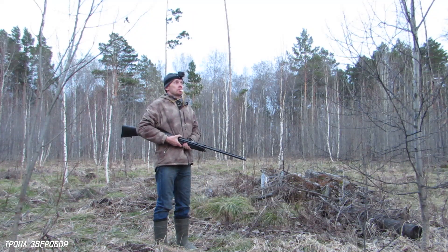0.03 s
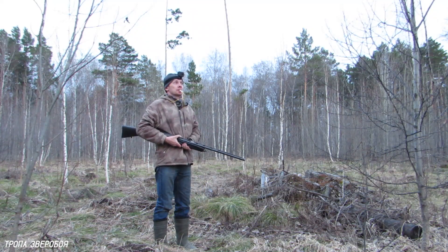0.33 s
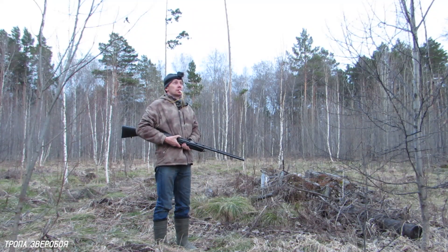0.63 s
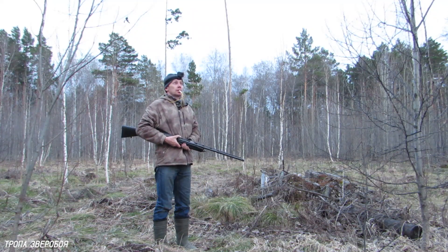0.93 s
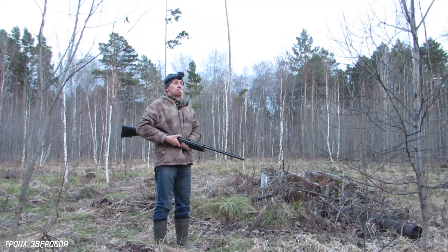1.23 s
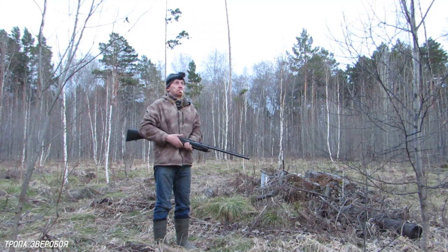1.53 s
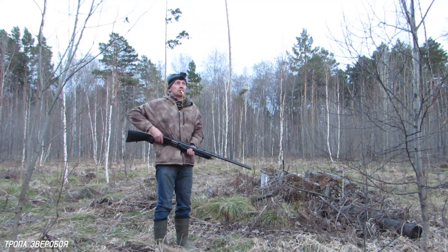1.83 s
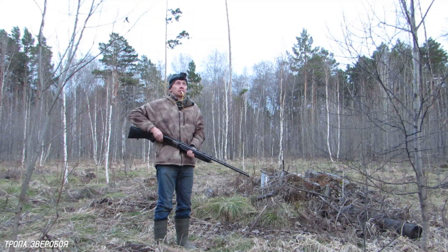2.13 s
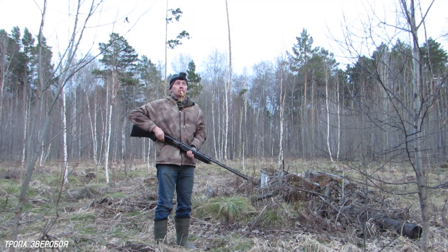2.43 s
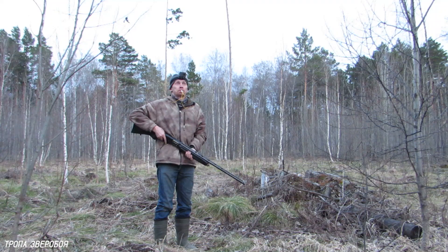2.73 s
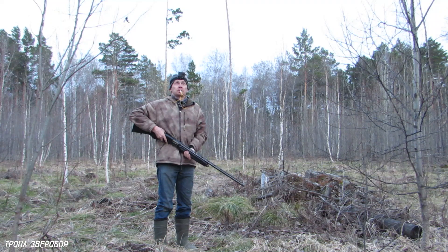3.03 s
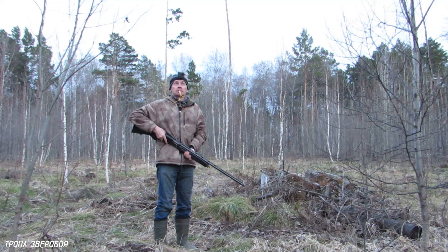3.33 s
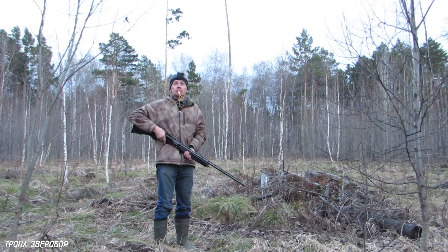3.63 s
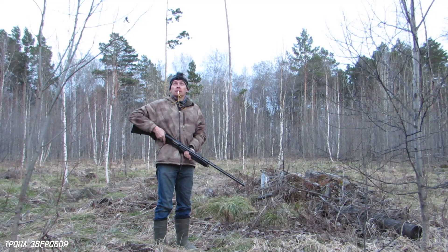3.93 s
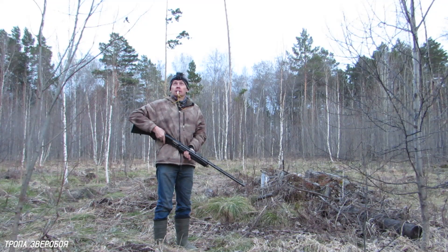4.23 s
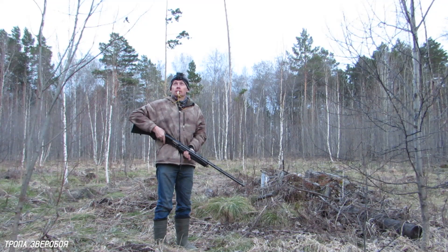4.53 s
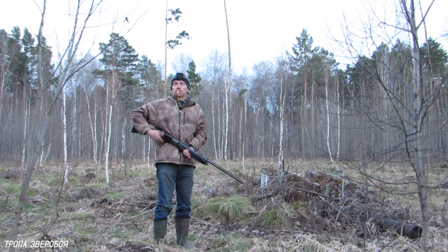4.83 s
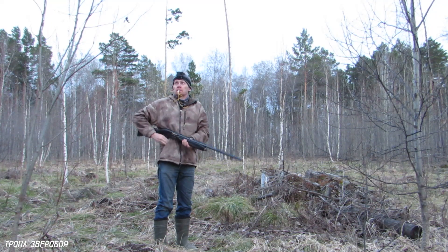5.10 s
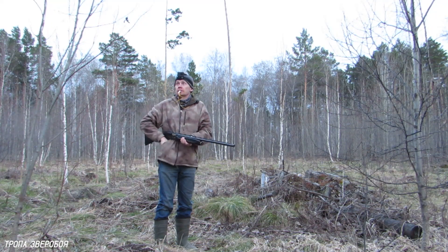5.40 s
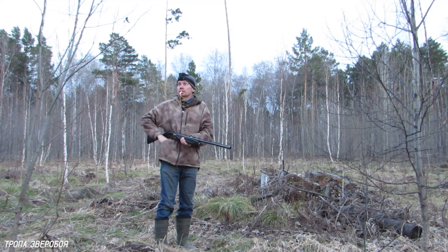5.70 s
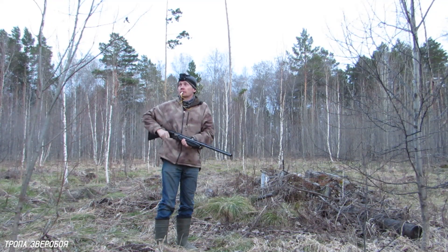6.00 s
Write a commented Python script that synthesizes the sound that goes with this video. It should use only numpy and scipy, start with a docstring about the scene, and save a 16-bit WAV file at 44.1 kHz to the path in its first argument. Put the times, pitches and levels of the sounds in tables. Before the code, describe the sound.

A small whistle imitates a bird with high, hissy squeaks, two at a time, three times over, near and to the left. Each squeak sweeps quickly upward and leaves a brief tail among the trees. A jacket rustles faintly around the first and last pairs, and gear clicks just before the second. Underneath lie the quiet murmur of woodland and a low, uneven wind rumble on the microphone.

```python
"""Woodcock lure in a clearing

A hunter in still woodland imitates a woodcock's flight call on a small whistle, close to the left
microphone: three pairs of squeaks. Each puff drives the whistle up through its registers in about a
tenth of a second, over a hiss of air, and the trees return a short tail. His jacket rustles and his
gear ticks as he shifts; light wind rumbles on the microphone and far trees murmur."""
import sys
import numpy as np
from scipy import signal
from scipy.fft import rfft, irfft, next_fast_len
from scipy.io import wavfile

SR = 44100
rng = np.random.default_rng(int(sys.argv[2]) if len(sys.argv) > 2 else 0)


def store_pcm(level_fs):
    """Save levels as 16-bit WAV."""
    pcm = np.round(np.clip(level_fs, -1, 1) * 32767).astype(np.int16)
    wavfile.write(sys.argv[1], SR, np.atleast_2d(pcm).T)


N = 267246
PREROLL = SR // 5
TIME = np.arange(-PREROLL, N) / SR


def amp(db):
    """Decibels to gain."""
    return 10 ** (np.asarray(db) / 20)


def unit_rms(x):
    """Scale to rms 1."""
    return x / np.sqrt(np.mean(x ** 2) + 1e-20)


def low_pass(x, hz, order=2):
    """Butterworth low-pass."""
    return signal.sosfilt(signal.butter(order, hz, fs=SR, output="sos"), x)


def wobble(hz, size):
    """Random wavering up to the given rate, rms 1."""
    return unit_rms(low_pass(rng.standard_normal(size + PREROLL), hz)[PREROLL:])


def noise(spectrum, size, channels=1):
    """Independent noises shaped by an EQ curve and rolled off below its first point, rms 1."""
    hz, db = np.transpose(spectrum)
    n = next_fast_len(size)
    bin_hz = np.maximum(np.fft.rfftfreq(n, 1 / SR), 1)
    gain = amp(np.interp(np.log(bin_hz), np.log(hz), db)) * np.minimum(bin_hz / hz[0], 1) ** 2
    white = rng.standard_normal((channels, n))
    return unit_rms(irfft(rfft(white) * gain, n)[:, :size])


def pan(db):
    """Left and right gains for a level difference; positive leans left."""
    return amp(np.array([[db], [-db]]) / 2)


def phase_of(hz):
    """Running phase of a moving pitch."""
    return 2 * np.pi * np.cumsum(hz) / SR


def add(out, start_s, sound):
    """Mix a stereo sound in at the given time."""
    at = max(PREROLL + round(start_s * SR), 0)
    out[:, at:at + sound.shape[1]] += sound


# Tone colour of the distant trees: freq_hz, density_db
FOREST_EQ = [(60, 2.5), (150, -3), (260, -2.5), (400, -0.5), (800, -5.5), (1200, -12.5), (2000, -21.5),
             (3000, -25.5), (6000, -28), (15500, -29.5)]

def forest(level_db=-56.5, pan_db=4, shared=0.38):
    """The bed: an even murmur of far trees, partly alike on both sides."""
    air = noise(FOREST_EQ, len(TIME), channels=3)
    return amp(level_db) * pan(pan_db) * unit_rms(air[:2] + shared * air[2])


# Fader curve of the gusts: time_s, level_db
GUST_CURVE = [(0.0, -38), (0.15, -58), (1.25, -56), (1.4, -36), (1.52, -49.5), (1.74, -38), (2.38, -53.5),
              (2.67, -45), (3.05, -50), (3.14, -44.5), (3.24, -57.5), (3.65, -53.5), (3.7, -61),
              (4.72, -52.5), (4.76, -44), (5.4, -49.5), (5.43, -43.5), (6.06, -52.5)]
# Tone colour of the rumble: freq_hz, density_db
WIND_EQ = [(15, 6), (30, -1.5), (50, -8.5), (80, -14.5), (130, -26.5), (250, -30), (500, -58.5)]

def wind(trim_db=6, pan_db=-5, eddy_db=2, eddy_hz=7):
    """Gusts rumble on each microphone port separately, broken up by quick eddies."""
    gust_db = np.interp(TIME, *np.transpose(GUST_CURVE))
    level_db = trim_db + gust_db + eddy_db * wobble(eddy_hz, len(TIME))
    return amp(level_db) * pan(pan_db) * noise(WIND_EQ, len(TIME), channels=2)


# The jacket rubs as he shifts: start_s, swell_s, length_s, level_db
JACKET_RUBS = [(-.1, .05, 0.38, -66.5), (1.129, 0.22, 0.85, -55.5), (1.89, 0.36, 0.49, -65.5),
               (2.5, 0.066, 0.53, -68.5), (2.9, .08, 0.14, -60.5), (4.76, 0.25, 0.723, -53.5),
               (5.431, 0.052, 0.11, -58.5), (5.56, 0.13, 0.23, -58), (5.773, .1, .3, -61.5)]
# Tone colour of the cloth: freq_hz, density_db
CLOTH_EQ = [(110, 18.5), (200, 12.5), (400, 7), (900, 1.5), (2200, -1.5), (4500, -8.5), (9500, -10),
            (15000, -24)]

def jacket(trim_db=8.5, rest_db=-78.5, pan_db=-8.5, fade_db_per_s=7.5, release_s=0.049,
           grain_db=1.5, grain_hz=43):
    """Cloth rubs over a faint resting rustle: each rub swells, slowly fades and stops quickly."""
    power = amp(rest_db) ** 2
    for start_s, swell_s, length_s, level_db in JACKET_RUBS:
        t = np.maximum(TIME - start_s, 0)
        swell = np.minimum(t / swell_s, 1) ** 2
        fade = amp(level_db - fade_db_per_s * np.maximum(t - swell_s, 0))
        release = np.exp(-np.maximum(t - length_s, 0) / release_s)
        power = power + (fade * swell * release) ** 2
    grain = amp(trim_db + grain_db * wobble(grain_hz, len(TIME)))
    return np.sqrt(power) * grain * pan(pan_db) * noise(CLOTH_EQ, len(TIME), channels=2)


# Ticks of his gear: start_s, level_db, crack_db (against the ring), pan_db
GEAR_TICKS = [(2.3359, -25.5, -14, -10.5), (2.5666, -35, -33, -5.5), (3.0078, -42, -18, 5),
              (4.2293, -44.5, -3.5, -16), (4.42, -47, -22, -15)]
# Modes the gear rings with: pitch_hz, level_db, t60_s
GEAR_MODES = [(1370, -18, 0.026), (1630, -11, 0.016), (2080, 6.5, 0.0041), (2520, 1.5, 0.0013),
              (3330, -8, 0.004), (4920, -3, 0.0018), (8100, -25, 0.0012)]

def gear(contact_s=0.0026, trim_db=-1.5, low_cut_hz=800, crack_hz=11000):
    """A brief gritty contact cracks and rings the modes of a part too small to radiate bass."""
    out = np.zeros((2, len(TIME)))
    t = np.arange(SR // 20) / SR
    body = sum(amp(db - 60 * t / t60) * np.sin(2 * np.pi * hz * t) for hz, db, t60 in GEAR_MODES)
    low_cut = signal.butter(2, low_cut_hz, "high", fs=SR, output="sos").repeat(2, axis=0)
    for start_s, level_db, crack_db, pan_db in GEAR_TICKS:
        contact = rng.standard_normal(len(t)) * np.exp(-t / contact_s)
        ring = unit_rms(signal.fftconvolve(contact, body)[:len(t)])
        crack = amp(crack_db) * unit_rms(low_pass(contact, crack_hz, order=4))
        tick = signal.sosfilt(low_cut, ring + crack)
        add(out, start_s, amp(level_db + trim_db) * pan(pan_db) * tick / np.abs(tick).max())
    return out


def clearing(x, near_db=-17, near_t60_s=0.11, near_pan_db=15, far_db=-37, far_t60_s=0.46, far_pan_db=9,
             predelay_s=0.0026, air_hz=9000, air_db_per_s=60):
    """Reverb: quick scatter from body and ground, then a faint tail from the trunks, dulled by the air."""
    t = np.arange(SR // 2) / SR
    response = 0
    for db, t60_s, pan_db in ((near_db, near_t60_s, near_pan_db), (far_db, far_t60_s, far_pan_db)):
        echoes = rng.standard_normal((2, len(t))) * amp(-60 * t / t60_s) * (t > predelay_s)
        echoes /= np.linalg.norm(echoes, axis=1, keepdims=True)
        response = response + amp([[db], [db - pan_db]]) * echoes
    dull = low_pass(low_pass(response, air_hz)[:, ::-1], air_hz)[:, ::-1]   # both ways: no phase shift
    response = dull + (response - dull) * amp(-air_db_per_s * t)
    return signal.fftconvolve(x[None], response, axes=1)[:, :len(x)]


def peep(length_s, start_hz, end_hz, level_db, right_db=-12, jitter=0.074, flutter=.35):
    """A soft, unsteady sweep, as when the whistle is barely blown."""
    n = int(length_s * SR)
    pitch_hz = np.linspace(start_hz, end_hz, n) * (1 + jitter * wobble(700, n))
    tone = np.sin(phase_of(pitch_hz)) * (1 + flutter * wobble(430, n))
    return np.sqrt(2) * amp([[level_db], [level_db + right_db]]) * np.hanning(n) * tone


# Stray soft peeps: start_s, length_s, start_hz, end_hz, level_db
STRAY_PEEPS = [(2.523, 0.08, 2200, 2890, -54), (2.774, .024, 1704, 2145, -46.5),
               (4.084, 0.0081, 5000, 7400, -57.5), (4.143, 0.0093, 8500, 5160, -58)]

def stray_peeps():
    """Faint peeps slip out of the whistle between the squeaks."""
    out = np.zeros((2, len(TIME)))
    for start_s, *shape in STRAY_PEEPS:
        add(out, start_s, peep(*shape))
    return out


# Time the blow takes to climb through each register: climb_s
REGISTER_CLIMB = (.0105, .0045, .021, .021, .02)
# How each register takes hold: entry_db, full_db, full_at (share of the way through it)
REGISTER_ATTACK = [(-40, -26, 0.31), (-23, -23.5, .8), (-24, -11, .82), (-11, -7.5, 0.81), (-6.5, -7.5, .5)]

def puff(t, top, ease, stumble_db, shrillest_register=3):
    """The blow climbs one step a register and eases into its top; each register swells as it speaks."""
    entry_db, full_db, full_at = np.transpose(REGISTER_ATTACK)
    entry_db[shrillest_register] += stumble_db
    step_s = np.r_[0, np.cumsum(REGISTER_CLIMB), 1]
    steps = np.r_[np.arange(len(REGISTER_CLIMB) + 1), 1 / REGISTER_CLIMB[-1]]
    climb = np.interp(t, step_s, steps)
    blow = np.maximum(-ease * np.logaddexp(-climb / ease, -top / ease), 0)   # soft ceiling at top
    register = blow.astype(int)
    hold = np.sin(np.pi / 2 * np.minimum(blow % 1 / full_at[register], 1)) ** 2
    return blow, register, entry_db[register] + (full_db - entry_db)[register] * hold


# Tone colour of air rushing through the whistle: freq_hz, density_db
JET_EQ = [(300, -20.5), (1500, -15), (2800, -15), (3900, -18), (4800, -8), (6000, 4.5), (7300, 1.5),
          (8800, 0), (11500, 0.5), (15500, -7.5)]

def air_jet(t, level_db, trim_db=-19.5, follow=0.41, grit_db=2, swell_s=0.0078, dull_hz=7500):
    """Stereo hiss that starts soft and dull, and brightens as the jet gathers speed."""
    speed = 1 - np.exp(-t / swell_s)
    hiss = noise(JET_EQ, len(t), channels=2)
    hiss = speed ** 2 * hiss + speed * (1 - speed) * low_pass(hiss, dull_hz)
    return amp(trim_db + follow * level_db + grit_db * wobble(250, len(t))) * hiss


# Glide of the undertone at blow 1, 2, 3, 4: pitch_hz
UNDERTONE_PITCH = (3400, 4200, 5750, 7400)
# Its balance against the main tone at the same steps: level_db
UNDERTONE_LEVEL = (-11, -22.5, -14.5, -13)

def undertone(blow, sag, jitter=.035):
    """An unsteady lower tone glides on under the register jumps."""
    steps = np.arange(1, 5)
    pitch_hz = np.interp(blow, steps, UNDERTONE_PITCH) * sag * (1 + jitter * wobble(1400, len(blow)))
    level_db = np.interp(blow, steps, UNDERTONE_LEVEL, left=-np.inf, right=-np.inf)
    return amp(level_db) * np.sin(phase_of(pitch_hz))


# Range of each whistle register: low_hz, high_hz
REGISTER_RANGE = [(2500, 3400), (5300, 6100), (6500, 8450), (9750, 11850), (7200, 8050)]
# Voicing of each register: tone_db, octave_db (against the tone)
REGISTER_VOICE = [(-5, -2), (0.5, -28.5), (-3.5, -21), (-2.3, -41), (-3, -6.5)]

def whistle_tone(t, blow, register, sag, hoarse_jitter=0.024, clear_jitter=0.0062,
                 dip_depth=.85, dip_s=0.00069, flutter=0.1):
    """The pitch rises within a register, then falters and jumps to the next; the low two are hoarse."""
    low_hz, high_hz = np.array(REGISTER_RANGE)[register].T
    tone_db, octave_db = np.array(REGISTER_VOICE)[register].T
    pitch_hz = (low_hz + (high_hz - low_hz) * (blow % 1)) * sag
    jitter = np.where(register < 2, hoarse_jitter, clear_jitter)
    phase = phase_of(pitch_hz * (1 + jitter * wobble(900, len(t))))
    tone = np.sin(phase) + amp(octave_db) * np.sin(2 * phase)
    for jump_s in t[1:][np.diff(register) != 0]:
        tone *= 1 - dip_depth * np.exp(-((t - jump_s) / dip_s) ** 2)
    tone += undertone(blow, sag)
    return np.sqrt(2) * amp(tone_db) * tone * (1 + flutter * wobble(500, len(t)))


def squeak(length_s, top, ease, sag_s, gain_db, accent_db, stumble_db,
           accent_s=.015, droop=.27, collapse=.16, fade_db=8, fade_s=.005, stop_s=.0015):
    """Tone and jet hiss of one puff; pitch and level sag as the air stops."""
    t = np.arange(int(length_s * SR)) / SR
    left_s = t[-1] - t
    blow, register, swell_db = puff(t, top, ease, stumble_db)
    attack_db = accent_db * np.exp(-(t / accent_s) ** 4)
    level_db = swell_db + gain_db + attack_db - fade_db * np.exp(-left_s / fade_s)
    slack = np.exp(-left_s / sag_s)
    sag = (1 - droop * slack) * (1 - collapse * slack ** 3)
    tone = amp(level_db) * whistle_tone(t, blow, register, sag)
    stop = np.minimum(left_s / stop_s, 1)
    return tone * stop, air_jet(t, level_db) * stop


# Puffs into the whistle; the first leaves only its tail at the start, the rest come in pairs:
# start_s, length_s, top_registers (0-5), ease_registers, sag_s, gain_db, accent_db (on the attack),
# stumble_db (on entering the shrillest register), lead_in_db, right_db
PUFFS = [ (-.094, .09, 4.22, .1, .002, -2.5, 0, 0, -40, -26),
         (1.302, .0765, 3.68, .12, .003, 2, 1, -2, -37, -21),
         (1.484, .096, 4.82, .1, .0022, 2.8, -3.5, 0, -44, -18.5),
         (2.605, .092, 4.22, .1, .0026, 1.4, 4.5, -1, -40, -30),
         (2.806, .0715, 3.88, .45, .002, 2.5, -3, -4, -37, -28),
         (4.7435, .0915, 4.07, .45, .0035, .8, 0, -8, -34, -22),
         (4.929, .104, 4.77, .1, .0038, -.2, -1, -10, -37, -18.5)]

def whistle(lead_in_s=.009, lead_in_hz=(2270, 3450), shade_hz=11000, right_jet_db=6,
            bend_hz=2600, bend_db=18):
    """A tiny peep leads into each squeak; the right microphone is shaded, but low hiss bends round."""
    out = np.zeros((2, len(TIME)))
    for start_s, *blowing, lead_in_db, right_db in PUFFS:
        tone, jet = squeak(*blowing)
        shaded = low_pass(tone + amp(right_jet_db) * jet[1], shade_hz)
        bent = amp(bend_db) * low_pass(jet[1], bend_hz, order=4)
        add(out, start_s, np.array([tone + jet[0], amp(right_db) * (shaded + bent)]))
        add(out, start_s - lead_in_s, peep(lead_in_s, *lead_in_hz, lead_in_db))
    return out


def scene():
    """The lure with its echoes, the hunter's movements and the air."""
    lure = whistle() + stray_peeps()
    return (lure + clearing(lure[0]) + gear() + jacket() + wind() + forest())[:, PREROLL:]


def record(dry, mic_hz=15500, cutoff_hz=15900):
    """The microphone softens the highest treble, peaks stop at full scale and the top is cut."""
    heard = np.clip(low_pass(dry, mic_hz), -1, 1)
    return signal.sosfilt(signal.ellip(12, .1, 80, cutoff_hz, fs=SR, output="sos"), heard)


dry = scene()
out = record(dry)
store_pcm(out)
```